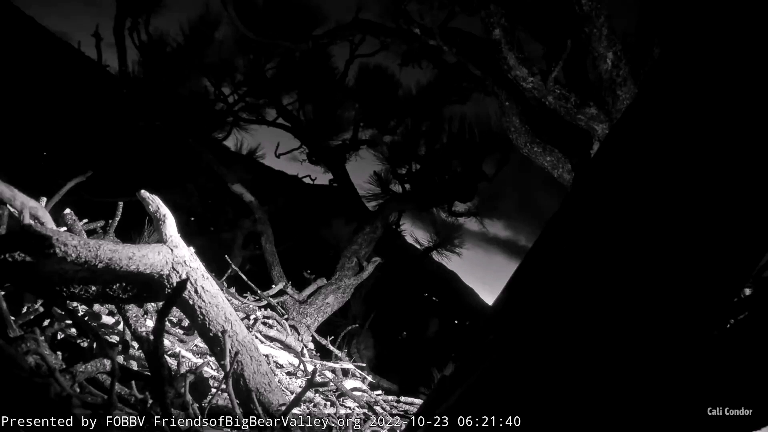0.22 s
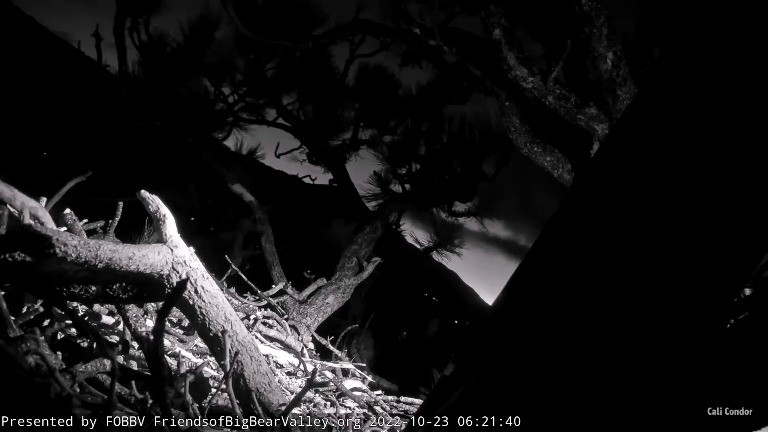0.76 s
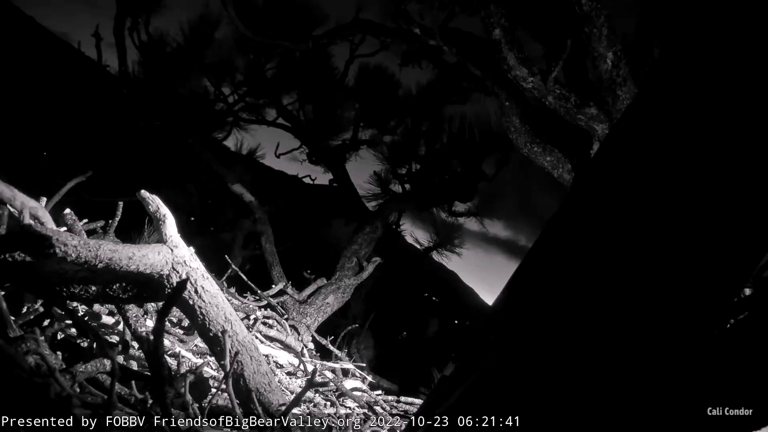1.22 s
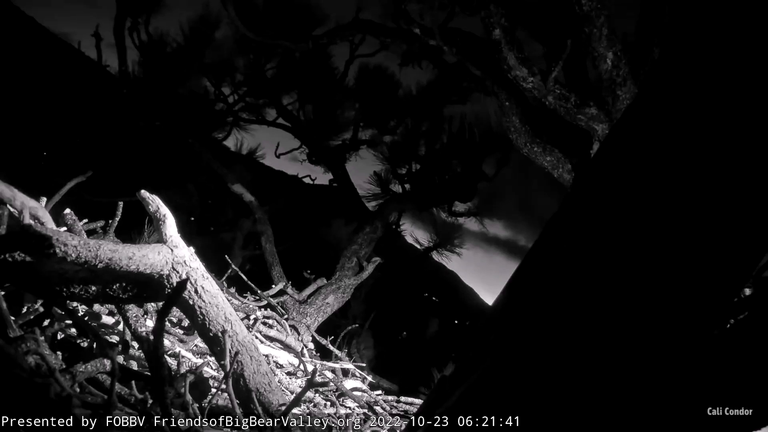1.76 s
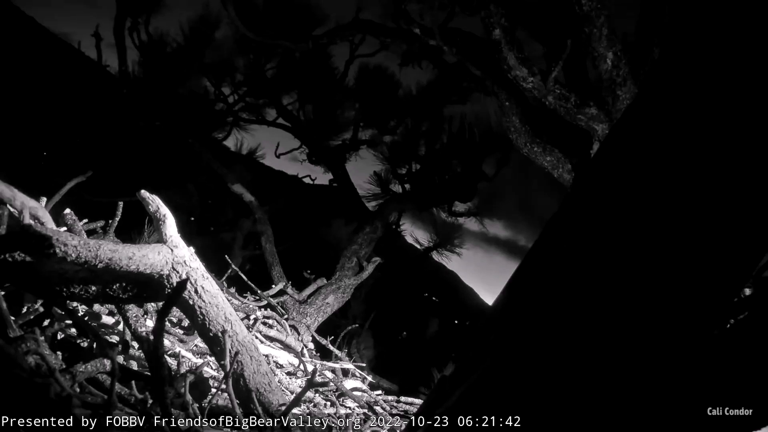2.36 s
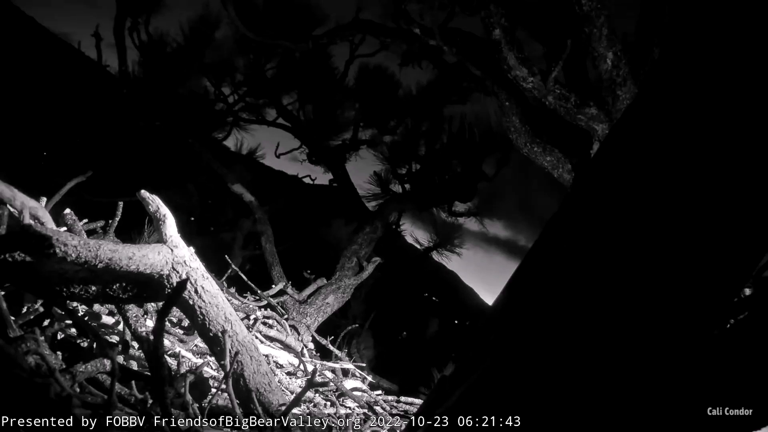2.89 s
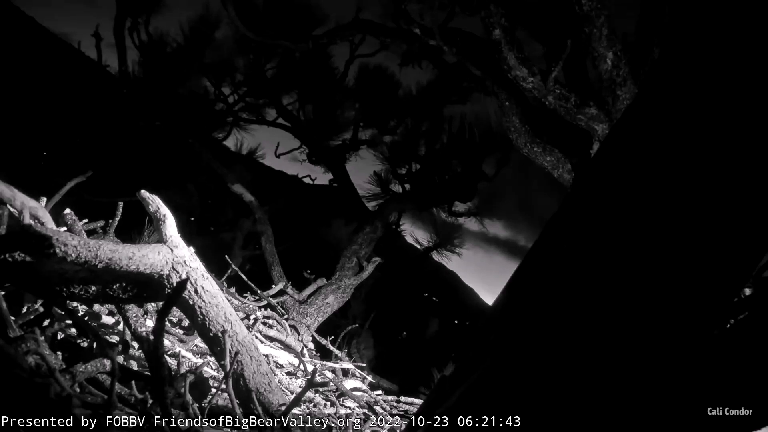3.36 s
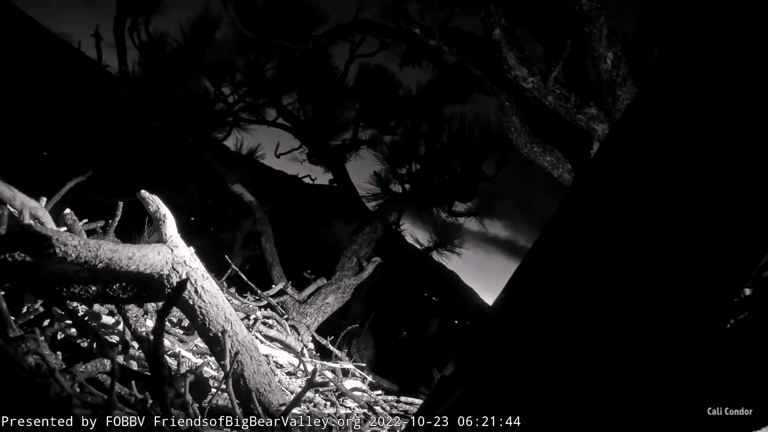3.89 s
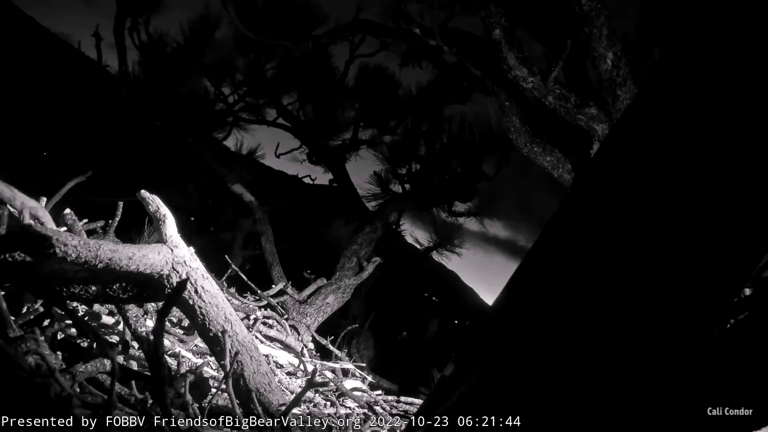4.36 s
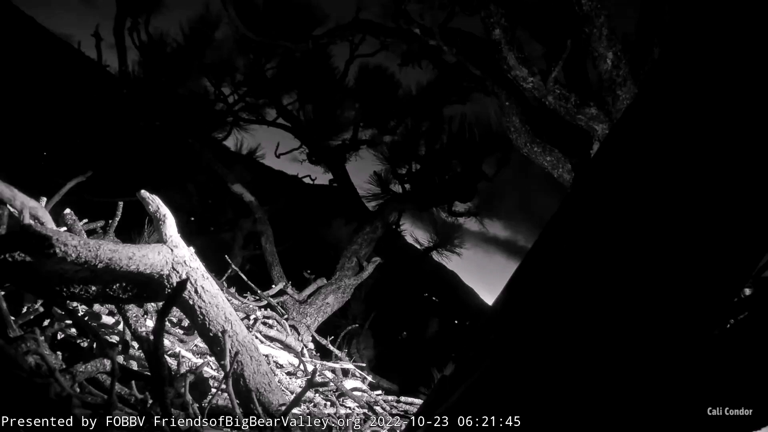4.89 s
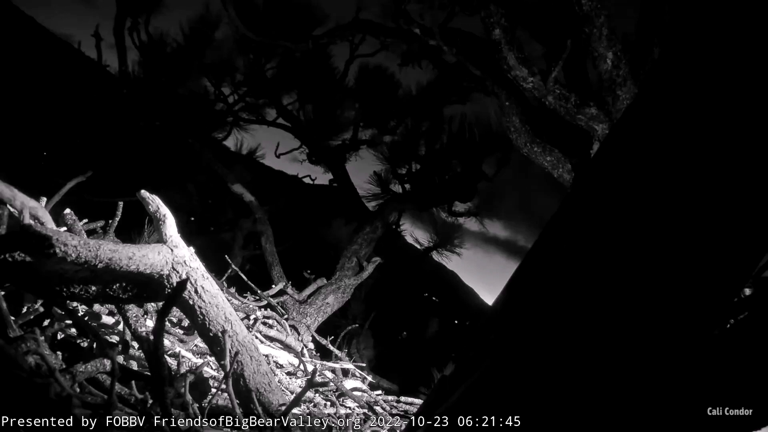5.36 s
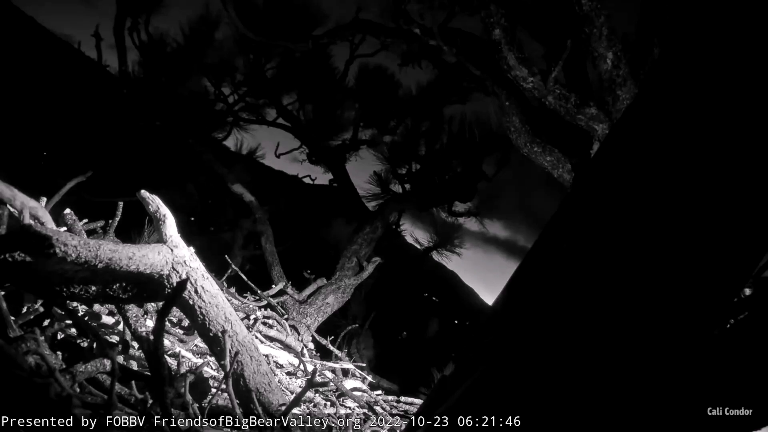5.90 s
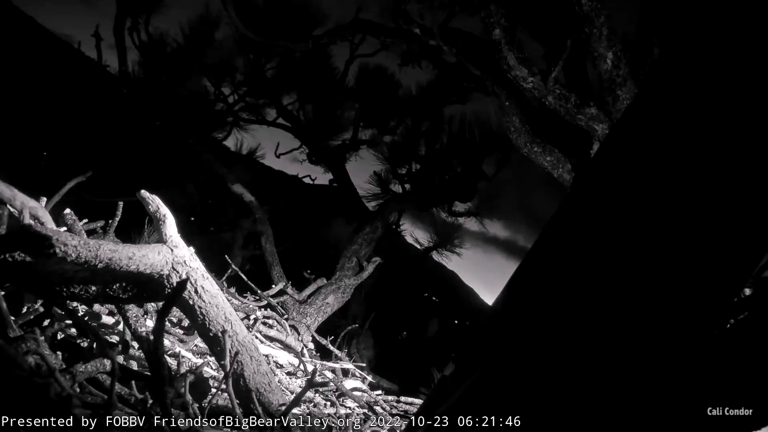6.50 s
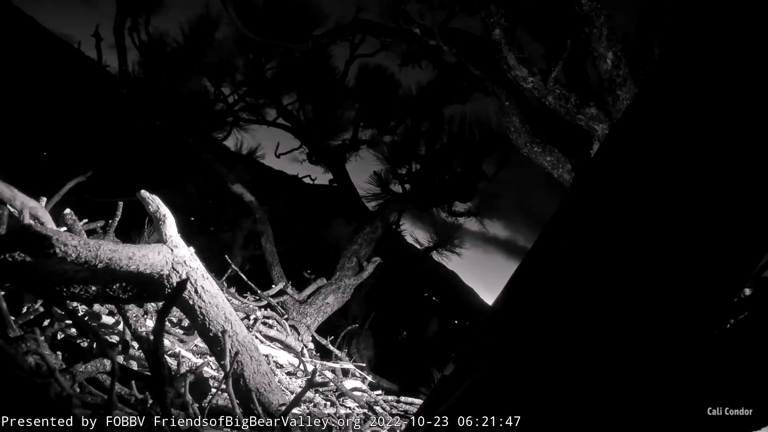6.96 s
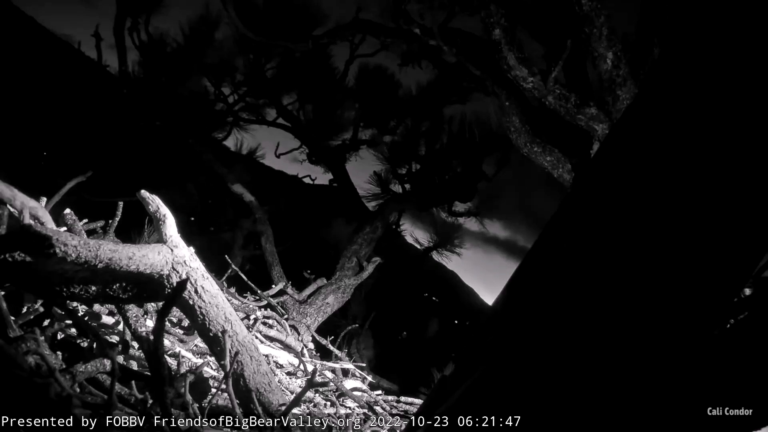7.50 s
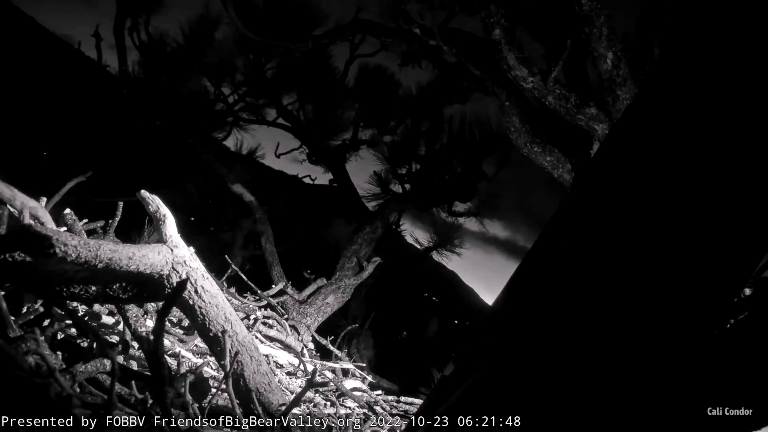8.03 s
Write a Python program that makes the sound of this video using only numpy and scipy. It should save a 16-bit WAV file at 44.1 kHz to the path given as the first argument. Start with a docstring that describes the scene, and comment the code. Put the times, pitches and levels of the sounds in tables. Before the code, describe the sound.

Several birds chip and whistle in echoing, overlapping notes over a steady low wind rumble and faint hiss in a forest.

```python
"""Dawn in a pine forest, heard from a microphone fixed high in a tree.
From the start, wind rumbles and a low hum wavers under the microphone's hiss and a few tiny ticks.
Birds begin to chip and pipe with their voice box, the syrinx; each note echoes long among the trunks.
Near 3 s come held whistles, rasping notes, a rustle in the branches and soft snaps of twigs.
From 5.5 s a short tune climbs in steps, twice, and the songs overlap more busily towards the end."""
import sys
import numpy as np
from scipy import signal
from scipy.fft import rfft, irfft, next_fast_len
from scipy.io import wavfile
from scipy.ndimage import map_coordinates

SR = 44100
rng = np.random.default_rng(int(sys.argv[2]) if len(sys.argv) > 2 else 0)


def materialize(psi):
    """Save the field psi as 16-bit PCM at rate SR to the path in sys.argv[1].

    A 1-D psi becomes a single channel; in a 2-D psi each row is a channel.
    """
    bounded = np.clip(np.atleast_2d(psi).T, -1, 1)
    quanta = np.round(bounded * 32767).astype(np.int16)
    wavfile.write(sys.argv[1], SR, quanta)


N = 363825


def amp(db):
    """Turn decibels into a factor to multiply a sound by."""
    return 10 ** (np.asarray(db) / 20)


def unit(x):
    """Scale a sound to an average strength (rms) of 1."""
    return x / np.sqrt(np.mean(x ** 2) + 1e-20)


def wobble(rate, size=N):
    """A smooth curve through `rate` random values a second."""
    points = rng.standard_normal(int(size * rate / SR) + 4)
    return map_coordinates(points, [np.arange(size) * rate / SR])


def filtered(x, response):
    """Turn each frequency of a sound up or down by the factor response(hz)."""
    size = next_fast_len(len(x) + 8192)
    return irfft(rfft(x, size) * response(np.fft.rfftfreq(size, 1 / SR)), size)[:len(x)]


def noise(spectrum):
    """Noise of strength 1 whose tone colour follows rows of f/Hz, relative level/dB."""
    f, db = np.transpose(spectrum)
    white = rng.standard_normal(N)
    return unit(filtered(white, lambda hz: amp(np.interp(np.log(hz + 1), np.log(f), db))))


def add(track, start, sound):
    """Mix a sound into the track, `start` seconds in."""
    part = track[max(round(start * SR), 0):][:len(sound)]
    part += sound[:len(part)]


def wind(level_db=-36.5, gust_db=.5):
    """Far wind: a steady rumble that swells only slightly."""
    # tone colour of the wind: f/Hz, relative level/dB
    spectrum = [(12, -7.5), (24, 0.5), (65, 1), (90, -5), (125, -5), (165, -10.5), (315, -20), (630, -25.5),
                (1250, -34), (2300, -41), (4500, -49.5), (9000, -62)]
    return amp(level_db + gust_db * wobble(1.843)) * noise(spectrum)


def hum(hum_hz=109.45, gain_db=-1.5):
    """A low tone that wavers in pitch and strength."""
    # slow rise and fall of the hum: t/s, relative level/dB
    loudness = [(0, -42), (.3, -37.5), (1.4, -40), (2.001, -44), (2.7, -43.5), (3.3, -59), (4.5, -44.5),
                (5.2, -52), (5.8, -44), (7, -43), (8.2, -40.5)]
    db = np.interp(np.arange(N) / SR, *np.transpose(loudness)) + gain_db + 1.5 * wobble(9.8)
    hz = hum_hz + 4.5 * wobble(12)
    return amp(db) * np.sqrt(2) * np.sin(2 * np.pi * np.cumsum(hz) / SR)


def ticks(pitch_hz=11400, faint_db=(-46, -35)):
    """Tiny high ticks, a few vibrations long; fainter ones fall at random between the clear ones."""
    # clear ticks: t/s, peak level/dB
    clear = [(.21, -35), (1.309, -36), (4.678, -32), (5.823, -32), (5.870, -36), (6.779, -32), (7.227, -36),
             (7.317, -30.5), (8.11, -32)]
    out, t = np.zeros(N), np.arange(-64, 64) / SR
    tick = np.exp(-(t / .00012) ** 2) * np.cos(2 * np.pi * pitch_hz * t)
    faint = rng.uniform((0, faint_db[0]), (N / SR, faint_db[1]), size=(16, 2))
    for start, db in [*clear, *faint]:
        add(out, start, amp(db) * tick)
    return out


def syrinx(length, pitches, quaver, edge):
    """A bird's voice box glides through the pitches, trembling a little; gives phase and loudness."""
    progress = np.linspace(0, 1, max(int(length * SR), 64))
    hz = np.interp(progress, np.linspace(0, 1, len(pitches)), pitches)
    hz *= 1 + quaver * wobble(246, size=SR // 2)[:len(progress)]
    # fading in and fading out each take the share `edge` of the note
    ramp = np.clip(np.minimum(progress, 1 - progress) / edge, 0, 1)
    return 2 * np.pi * np.cumsum(hz) / SR, np.sqrt(2) * np.sin(np.pi / 2 * ramp)


def among_trees(note, hz, echo_db, forest_db=-1, branch_db=-12):
    """A note bounces off near branches and echoes among trunks; air and needles soak up high notes."""
    # how the echo dies away: t after the note/s, relative level/dB
    decay = [(0, 2.5), (.03, -1), (.15, -2.5), (.36, -3), (.44, -5), (1, -10.5), (2.2, -27)]
    t = np.arange(2 * SR) / SR
    loss_db = 4.5 * t * hz / 1000  # higher notes die sooner
    trunks = rng.standard_normal(len(t)) * amp(np.interp(t, *np.transpose(decay)) - loss_db)
    branches = rng.standard_normal(len(t)) * np.exp(-t / 0.05)
    paths = amp(forest_db + echo_db) * trunks / np.linalg.norm(trunks)
    paths += amp(branch_db) * branches / np.linalg.norm(branches)
    paths[0] += 1  # the sound that arrives directly
    return signal.fftconvolve(note, paths)


def chip(length, hz, sweep_hz, db, echo_db):
    """A brief, pure note that slides in pitch by sweep_hz, with its echo."""
    phase, swell = syrinx(length, [hz - sweep_hz / 2, hz + sweep_hz / 2], quaver=.012, edge=.27)
    return among_trees(amp(db) * swell * np.sin(phase), hz, echo_db)


def chips(twitter_note_s=0.0212):
    """Birds sing chips singly, in a climbing tune, and in even twitters that drift down in pitch."""
    # single chips: t/s, length/s, f/Hz, sweep/Hz, level/dB, echo boost/dB
    singles = [ (.278, 0.017, 1830, 70, -44, -2.5), (0.61, 0.032, 4060, 183, -44, 6),
               (0.645, 0.035, 3980, -140, -40, -3), (1.242, 0.027, 3174, -70, -43.5, -1),
               (1.36, 0.038, 3100, -260, -53.5, 2), (1.372, .024, 1367, -64, -54.5, -1),
               (1.523, 0.034, 1760, -85, -41, -3.5), (1.546, .027, 1630, -170, -51, 4),
               (2.185, 0.021, 1040, -145, -50.5, -22), (2.728, 0.023, 4097, 200, -55.5, 12),
               (4.999, 0.0307, 3953, -50, -38, -1.5), (6.214, 0.015, 3870, 197, -55, 2),
               (6.462, 0.014, 5450, -200, -55, -4), (6.765, .026, 3430, 150, -47, -9),
               (6.902, 0.013, 3390, -140, -43, -3),     (7.027, .034, 3210, -130, -34.5, -6),
               (7.169, 0.02, 3156, -29, -41.5, -2.5), (7.233, 0.014, 1750, 126, -51, 1),
               (7.31, 0.0394, 2857, -300, -59, 13.5), (7.549, .015, 1294, -90, -51.5, -2),
               (8.007, 0.028, 3950, -100, -56, 4)]
    # steps of the tune: delay/s, length/s, pitch ratio, sweep/Hz, added level/dB, added echo/dB
    steps = [(0, 0.0266, 1, 272, -1, 2.5), (.033, 0.0606, 1.295, 110, -7.5, 2.5),
             (.141, .034, 1.68, 260, -4.5, -1)]
    # each singing of the tune: t/s, steps sung, first f/Hz, base level/dB, echo boost/dB
    climbs = [(5.491, 2, 2513, -43, 1), (6.087, 3, 2581, -38.5, -0.5)]
    # soft twitters: t/s, notes, spacing/s, first f/Hz, last f/Hz, sweep/Hz,
    # first level/dB, last level/dB, echo boost/dB
    twitters = [ (0.527, 5, .15, 3480, 3410, 202, -55.5, -55, 7),
                (3.365, 4, 0.13, 3970, 3670, -350, -50.5, -64.5, 6),
                (6.568, 3, .106, 4326, 4154, 280, -52, -50, 5.5),
                (7.63, 3, .14, 3560, 3550, -150, -64.5, -68, 13.5)]
    out = np.zeros(N)
    for start, *note in singles:
        add(out, start, chip(*note))
    for start, count, hz, db, echo_db in climbs:
        for delay, length, ratio, sweep_hz, step_db, step_echo_db in steps[:round(count)]:
            step = chip(length, hz * ratio, sweep_hz, db + step_db, echo_db + step_echo_db)
            add(out, start + delay, step)
    for start, count, spacing, first_hz, last_hz, sweep_hz, first_db, last_db, echo_db in twitters:
        notes = np.linspace((first_hz, first_db), (last_hz, last_db), round(count))
        for k, (hz, db) in enumerate(notes):
            add(out, start + k * spacing, chip(twitter_note_s, hz, sweep_hz, db, echo_db))
    return out


def whistle(length, hz, flick, db, echo_db, octave_db):
    """A held note with a weak overtone an octave up; at the end its pitch drops by the share `flick`."""
    pitches = hz * (1 - flick * np.linspace(0, 1) ** 7)
    phase, swell = syrinx(length, pitches, quaver=.009, edge=.19)
    tone = np.sin(phase) + amp(octave_db) * np.sin(2 * phase)
    return among_trees(amp(db) * swell * tone, hz, echo_db)


def whistles(pipe_s=0.0577, pipe_flick=0.081, crest=0.57, swell_db=2):
    """Birds whistle singly and in piping runs that swell, slow and fade, their echoes ringing as one."""
    # single whistles: t/s, length/s, f/Hz, flick share, level/dB, echo boost/dB, overtone/dB
    singles = [(2.746, 0.038, 4180, 0, -48.5, 2.5, -40), (2.82, 0.13, 4206, 0.0087, -52.5, -3, -40),
               (3.11, 0.07, 4170, 0.019, -54, 4, -40), (5.567, 0.078, 3225, 0.064, -52.5, 6, -40),
               (7.242, .105, 2225, 0.1, -46.5, 4, -13.5), (7.913, 0.052, 2148, 0.049, -49, 2, -30)]
    # piping runs: t/s, notes, first to last note/s, slowing (1 = even pace), f/Hz, pitch fall/Hz,
    # top level/dB, final fade/dB, echo boost/dB, overtone/dB
    runs = [(.289, 8, .897, 1.54, 2703, 34, -39.5, 12, 0, -30),
            (7.366, 7, .572, 1.02, 2819, 22, -44.5, 6, 1.5, -20.5)]
    out = np.zeros(N)
    for start, *note in singles:
        add(out, start, whistle(*note))
    for start, count, span, slowing, hz, fall_hz, db, fade_db, echo_db, octave_db in runs:
        for progress in np.linspace(0, 1, round(count)):
            # the run is loudest where its progress reaches `crest`
            before_crest = max(1 - progress / crest, 0)
            past_crest = max((progress - crest) / (1 - crest), 0)
            note_db = db - swell_db * before_crest ** 2 - fade_db * past_crest ** 2
            note = whistle(pipe_s, hz - fall_hz * progress, pipe_flick, note_db, echo_db, octave_db)
            add(out, start + span * progress ** slowing, note)
    return out


def burst(length, hz, width_hz):
    """A short swell of noise in a band of frequencies around hz."""
    progress = np.linspace(0, 1, max(int(length * SR), 64))
    band = filtered(rng.standard_normal(SR // 4), lambda f: np.exp(-2 * ((f - hz) / width_hz) ** 2))
    return unit(band[:len(progress)]) * np.sqrt(np.abs(np.sin(np.pi * progress)))


def rasps(spacing_s=.102):
    """Harsh chatter: the syrinx flutters unevenly and makes noise instead of a tone."""
    # rasps, alone or in a rattle: t/s, notes, length/s, centre f/Hz, width/Hz, level/dB, echo boost/dB
    calls = [ (2.803, 4, .011, 3500, 500, -62, 7), (3.362, 2, 0.025, 3270, 250, -59.5, -1),
             (4.564, 1, .022, 3600, 700, -50, -0.5), (6.322, 3, 0.015, 4180, 1200, -51.5, -1),
             (6.662, 2, .024, 5300, 450, -60, -1), (7.999, 1, 0.017, 3430, 500, -46.5, -1)]
    out = np.zeros(N)
    for start, count, length, hz, width_hz, db, echo_db in calls:
        for k in range(round(count)):
            note = amp(db) * burst(length, hz, width_hz)
            add(out, start + k * spacing_s, among_trees(note, hz, echo_db))
    return out


def rustles():
    """Branches stir close by with a brief, soft brushing sound."""
    # stirrings: t/s, length/s, centre f/Hz, level/dB
    stirrings = [(3.123, 0.061, 2300, -67), (4.674, 0.057, 2200, -61), (8.133, 0.05, 975, -50.5)]
    out = np.zeros(N)
    for start, length, hz, db in stirrings:
        add(out, start, amp(db) * burst(length, hz, width_hz=0.88 * hz))
    return out


def twigs(decay_s=.007, dull_above_hz=3200):
    """Twigs snap softly, each a dull puff of noise that dies at once."""
    # snaps: t/s, starting level before dulling/dB
    snaps = [(3.135, -38.5), (3.178, -43), (4.685, -47)]
    out, t = np.zeros(N), np.arange(SR // 20) / SR
    for start, db in snaps:
        add(out, start, amp(db) * np.exp(-t / decay_s) * rng.standard_normal(len(t)))
    return filtered(out, lambda hz: 1 / (1 + (hz / dull_above_hz) ** 4))


def scene():
    """All the sounds of the forest, added into one channel."""
    birds = whistles() + chips() + rasps()
    return (birds + twigs() + rustles() + ticks() + wind() + hum())[None]


def record(dry, hiss_db=-58.0, top_hz=15700):
    """The microphone adds its own hiss and keeps nothing above top_hz."""
    # tone colour of the hiss: f/Hz, relative level/dB
    spectrum = [(500, -7.5), (3000, -5.5), (5000, -1.5), (8000, 1), (11500, 1.5), (13200, 1.5),
                (13900, -2.5), (14150, -29), (15600, -15.5)]
    hiss = amp(hiss_db) * noise(spectrum)
    return filtered(dry[0] + hiss, lambda hz: hz < top_hz)[None]


dry = scene()
out = record(dry)
materialize(out)
```